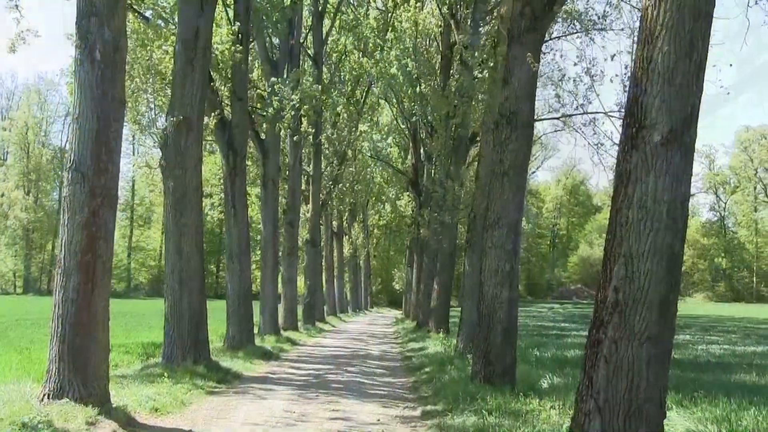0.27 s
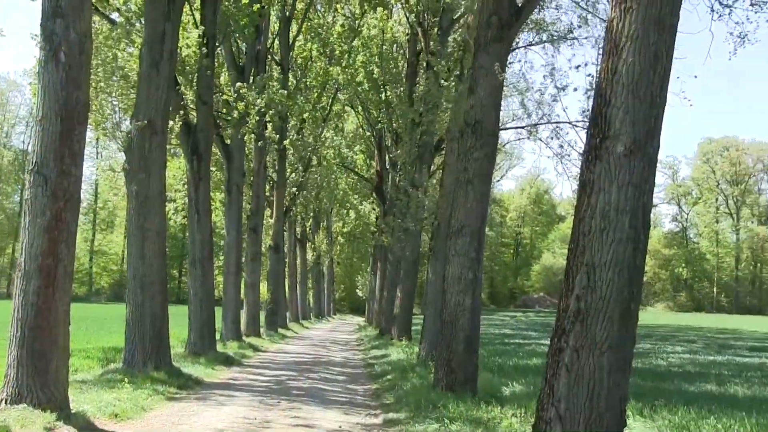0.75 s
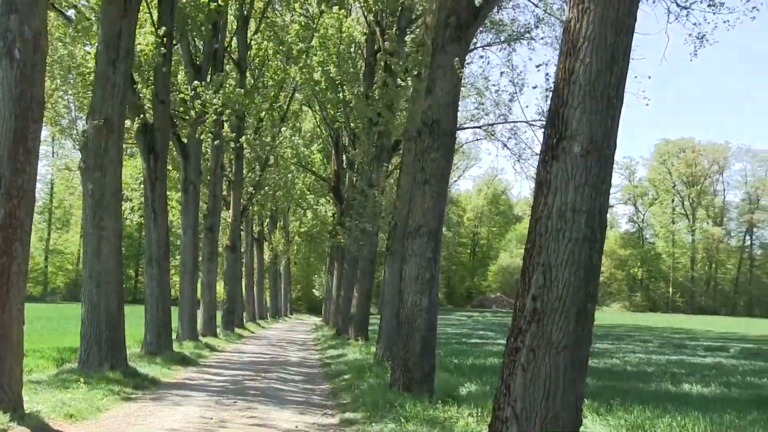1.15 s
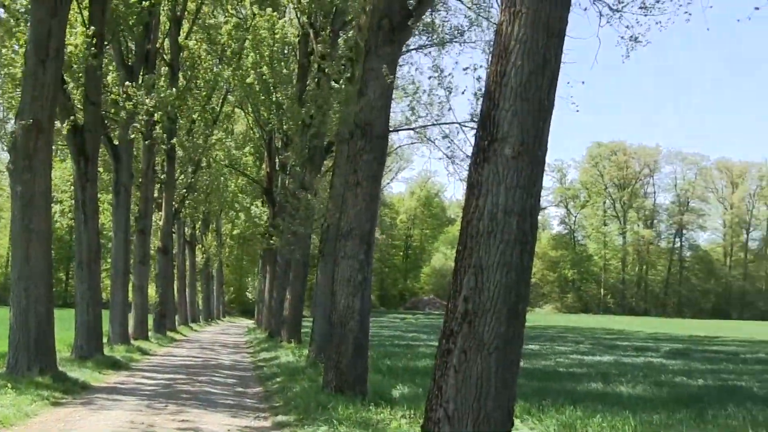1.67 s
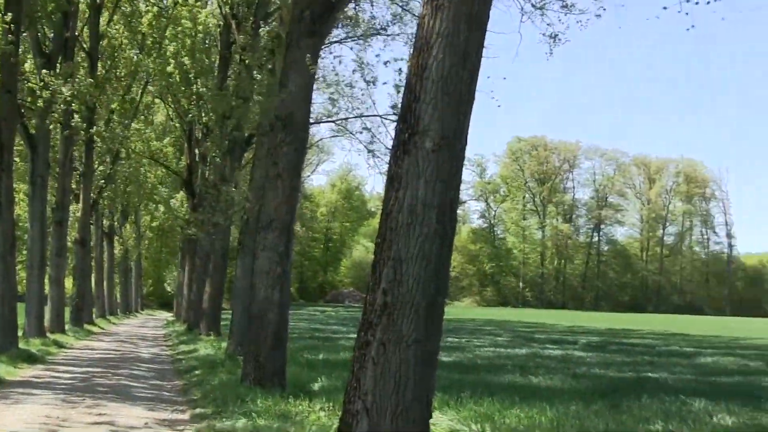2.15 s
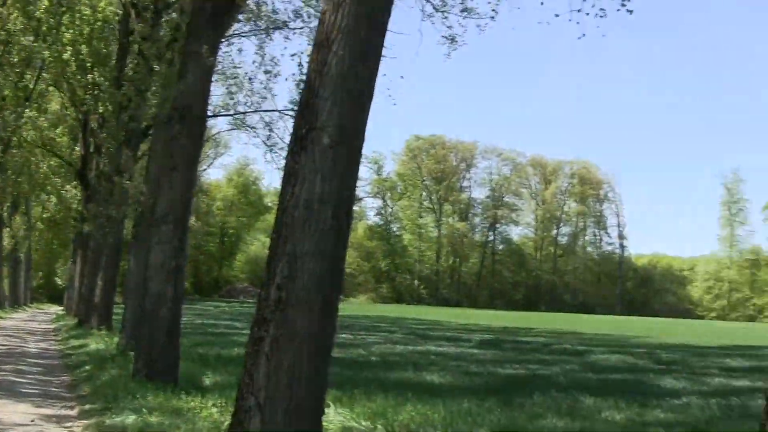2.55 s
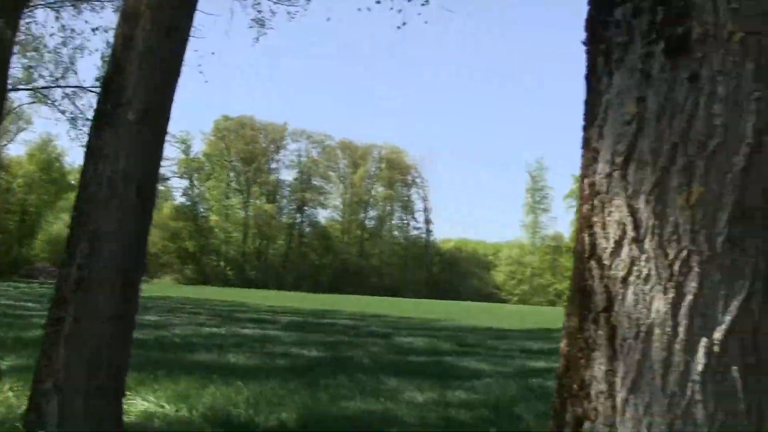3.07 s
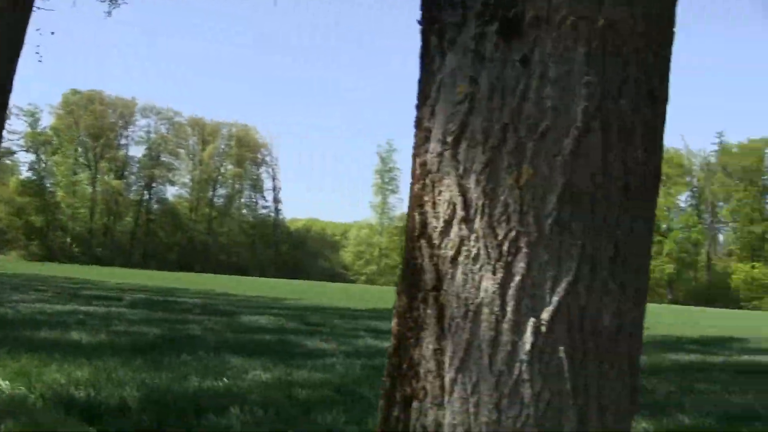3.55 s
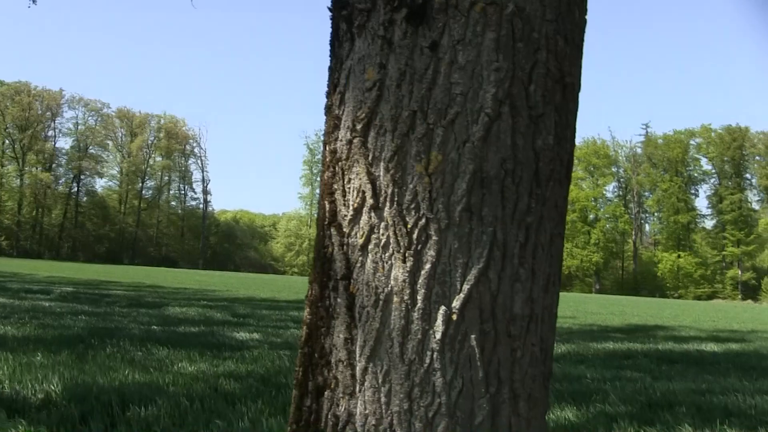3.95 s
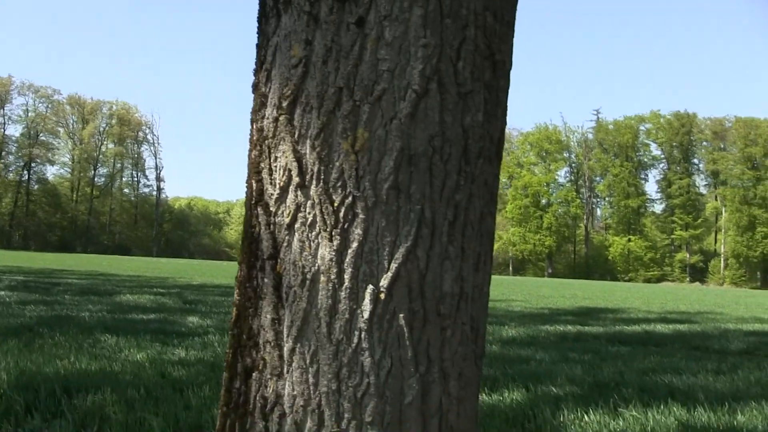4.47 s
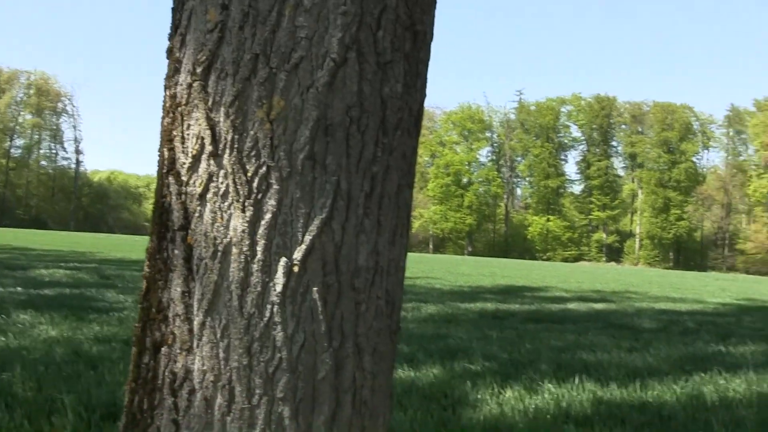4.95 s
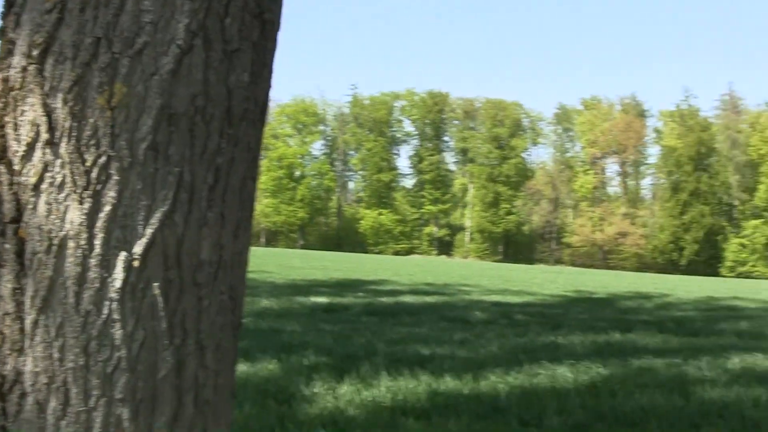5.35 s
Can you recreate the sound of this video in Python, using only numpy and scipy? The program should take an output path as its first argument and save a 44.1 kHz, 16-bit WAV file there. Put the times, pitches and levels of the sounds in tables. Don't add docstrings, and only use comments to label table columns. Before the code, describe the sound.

Wind buffets a hand-held camera's microphone in a leafy avenue, light thumps at first, then a harsh, nearly continuous gale with crackling overload.

```python
import sys
import numpy as np
from scipy import signal
from scipy.fft import rfft, irfft, next_fast_len
from scipy.io import wavfile
from scipy.ndimage import uniform_filter1d, map_coordinates

SR = 44100
rng = np.random.default_rng(int(sys.argv[2]) if len(sys.argv) > 2 else 0)


def dump_mix(stems):
    frames = np.atleast_2d(stems).T
    limited = np.clip(frames, -1, 1)
    pcm = np.round(limited * 32767).astype(np.int16)
    wavfile.write(sys.argv[1], SR, pcm)


def volts_from_decibels(level):
    exponent = np.asarray(level, float) / 20
    return 10 ** exponent


N = 247401


def unit(x):
    return x / np.sqrt(np.mean(x ** 2) + 1e-20)


def along(points, hz):
    f, v = np.transpose(points)
    return np.interp(np.log(hz + 1), np.log(f + 1), v)


def curves(rows):
    s, *columns = np.transpose(rows)
    return [np.interp(np.arange(N) / SR, s, column, left=-120) for column in columns]


def wobble(rate):
    return map_coordinates(rng.standard_normal(N // 100), [np.arange(N) * rate / SR])


def coloured(x, gain):
    m = next_fast_len(N + 8192)
    return irfft(rfft(x, m) * gain(np.fft.rfftfreq(m, 1 / SR)), m)[..., :N]


def shaped(x, spectrum):
    return unit(coloured(x, lambda hz: volts_from_decibels(along(spectrum, hz))))


def impulses(seconds, sizes):
    return np.bincount(np.clip((seconds * SR).astype(int), 0, N - 1), sizes, N)


# frequency_hz, density_db per Hz
LEAF_SPECTRUM = [(25, -40), (60, -5.5), (160, -7), (500, 0), (1200, 0), (2000, -3), (4300, -9.5),
                 (8000, -20.5), (13000, -27), (15600, -33)]
# frequency_hz, likeness 0 to 1
LEAF_COHERENCE = [(300, 1), (1500, 1), (3500, 1), (5000, 0.97), (7000, 0.74), (10000, 0.37), (15000, .2)]
# time_s, gain_db
LEAF_GAIN = [(0, -3), (.45, 1), (2.178, 1.5), (2.19, -15), (2.4, -15.5), (2.76, -10), (2.86, -13),
             (2.93, -13), (3.08, -17.5), (3.27, -17), (3.33, -13), (3.72, -13.5), (3.78, -17.5),
             (4.49, -12), (4.62, -24.5), (4.78, -19.5), (5.0, -16), (5.61, -14)]
# frequency_hz, density_db
SHEEN_SPECTRUM = [(4000, -31), (7000, 0.5), (11000, 0), (15600, -7.5)]


def leaves():
    hiss_db, sheen_db = -29, -15.5
    ducked_db = -14
    bins = signal.stft(rng.standard_normal((2, N)), nperseg=512)[2]
    patches = uniform_filter1d(rng.standard_normal(bins.shape[1:]), size=6, axis=0)
    patches = uniform_filter1d(patches, size=12, axis=1)
    pair = signal.istft(bins * volts_from_decibels(0.44 * unit(patches)), nperseg=512)[1][:, :N]

    def mid_side_gain(hz):
        angle = np.arccos(np.clip(along(LEAF_COHERENCE, hz), -1, 1)) / 2
        return volts_from_decibels(along(LEAF_SPECTRUM, hz)) * np.array([np.cos(angle), np.sin(angle)])

    mid, side = coloured(pair, mid_side_gain)
    hiss = unit(np.array([mid + side, mid - side]))
    gain_db, = curves(LEAF_GAIN)
    fine = shaped(rng.standard_normal((3, N)), SHEEN_SPECTRUM)
    ducking = np.clip(gain_db / ducked_db, 0, 1)
    sheen = volts_from_decibels(sheen_db) * ducking * (fine[:2] + 0.54 * fine[2])
    return volts_from_decibels(hiss_db + gain_db + 0.44 * wobble(4.1)) * (hiss + sheen)


# time_s, level_db
STREAM_LEVEL = [(0, -41.5), (.5, -34.5), (1.3, -32), (2.0, -34.5), (2.2, -16), (2.47, -20), (3.0, -24),
                (3.9, -18), (4.35, -25.5), (4.6, -20), (5.07, -18.5), (5.3, -22.5), (5.61, -18.5)]
# start_s, length_s, level_db, sharpness_db
LIGHT_GUSTS = [(0.05, .035, -32.5, -33), (0.194, 0.036, -29.5, -38), (0.269, 0.034, -24.5, -39),
               (0.345, .04, -33.5, -24), (0.54, 0.061, -36, -41.5), (0.767, 0.041, -19, -36),
               (0.839, 0.075, -15.5, -28.5), (0.936, 0.061, -16, -32), (1.041, 0.051, -17.5, -39),
               (1.093, 0.062, -15, -30.5), (1.179, 0.023, -15.5, -31), (1.443, 0.06, -15, -33),
               (1.527, 0.038, -17.5, -36), (1.583, 0.071, -16, -32.5), (1.705, 0.022, -17.5, -40),
               (1.829, 0.02, -22.5, -40), (1.885, 0.13, -27.5, -38), (2.04, 0.027, -12.5, -25),
               (2.107, 0.053, -12.5, -31)]
# start_s, length_s, level_db, sharpness_db
GALE_GUSTS = [(2.182, 0.16, -9, -15.5), (2.321, 0.095, -14, -21.5), (2.504, 0.073, -11.5, -22.5),
              (2.612, 0.038, -15.5, -24.5), (2.71, 0.063, -9.5, -21.5), (2.775, 0.1, -14.5, -14),
              (2.834, 0.066, -17.5, -29.5), (2.905, 0.178, -11, -17), (3.109, 0.048, -12.5, -19.5),
              (3.196, 0.055, -9.5, -18), (3.273, .1, -11, -18.5), (3.418, 0.12, -11, -15.5),
              (3.553, 0.079, -10.5, -10.5), (3.654, 0.12, -10.5, -13), (3.777, 0.1, -17.5, -7),
              (3.91, 0.1, -23.5, -10.5), (3.993, .13, -10, -14.5), (4.128, 0.081, -13.5, -23.5),
              (4.257, 0.056, -13, -25), (4.448, 0.1, -9, -21), (4.575, 0.017, -10.5, -6.5),
              (4.603, 0.11, -12.5, -15.5), (4.684, 0.074, -13, -16.5), (4.782, 0.15, -11.5, -16.5),
              (4.955, 0.072, -12, -20.5), (5.128, 0.044, -10, -22), (5.242, 0.06, -10, -22.5),
              (5.316, 0.099, -9.5, -19), (5.528, 0.026, -15.5, -17), (5.571, 0.029, -9, -16)]
CREST_EXPONENT = [
    [0.91],
    [1.1],
    [0.61],
    [1.4],
]


def gusts():
    rise_s, fall_s = 0.021, 0.032
    crown_db = 2.5
    stream_sharp_db, middle_sharp_db = -27, -20.5
    t = np.arange(N) / SR

    def shares(sharp_db):
        lift_db = sharp_db - middle_sharp_db
        flutter_db = -8.5 + 0.45 * lift_db
        rumble_db = -18 - lift_db
        return volts_from_decibels(np.array([[0], [flutter_db], [rumble_db], [sharp_db]]))

    power = (volts_from_decibels(curves(STREAM_LEVEL)[0]) * shares(stream_sharp_db)) ** 2
    for s, length, db, sharp_db in LIGHT_GUSTS + GALE_GUSTS:
        near = slice(max(round((s - rise_s) * SR), 0), round((s + length + fall_s) * SR))
        u = t[near] - s
        shape = np.clip(1 + np.minimum(u / rise_s, (length - u) / fall_s), 0, 1) ** 2
        shape = shape * volts_from_decibels(crown_db * (0.29 - (2 * u / length - 1) ** 2))
        power[:, near] += (shape ** np.array(CREST_EXPONENT) * volts_from_decibels(db) * shares(sharp_db)) ** 2
    return 10 * np.log10(power)


# time_s, half_width_s, depth_db
FLOW_LULLS = [
    (1.021, 0.014, -2.5),
    (1.075, 0.013, 10.5),
    (2.095, 0.0053, 21),
    (2.153, 0.01, 15.5),
    (2.678, 0.0094, 24),
    (4.568, 0.0059, 7.5),
    (5.217, 0.0076, 4),
    (5.309, .013, 14.5),
    (5.573, 0.0091, 17),
]
# frequency_hz, density_db per Hz
RUMBLE_SPECTRUM = [(20, -17), (60, -38), (110, -8), (180, -1), (300, -7), (600, -39), (2500, -120)]
THUD_SPECTRUM = [(60, -57.5), (150, -14), (260, -0.5), (500, 0), (800, -12.5), (1500, -30.5), (3000, -67.5),
                 (8000, -120)]
FLUTTER_SPECTRUM = [(300, -78.5), (600, -1.5), (850, -0.5), (1500, -10.5), (2500, -21.5), (5000, -78),
                    (12000, -120)]
SPIT_SPECTRUM = [(700, -24.5), (1400, -4.5), (2200, -0.5), (3200, -7), (4500, -24.5), (7000, -37.5),
                 (16000, -94.5)]
FIZZ_SPECTRUM = [(2000, -24.5), (3500, -8), (5000, -12), (7500, -31), (11000, -49), (18000, -100)]


def eddies(count=4500):
    draw = rng.random((count, 3))
    at = draw[:, 0] * N / SR
    sign = np.sign(draw[:, 1] - 0.5)
    size = -np.log(draw[:, 2] + 0.015)
    lumps = 2.17 * wobble(30) + 1.45 * wobble(110)

    def layer(spectrum, scatter_db, lumpy, own_db, smooth):
        grains = unit(impulses(at, sign * volts_from_decibels(scatter_db * size)))
        flow = grains + smooth * rng.standard_normal(N)
        return shaped(flow * volts_from_decibels(lumpy * lumps + own_db * wobble(45)), spectrum)

    t = np.arange(N) / SR
    hold = volts_from_decibels(-sum(db * np.exp(-((t - s) / half) ** 4) for s, half, db in FLOW_LULLS))
    strong_s = np.array(STRONG_EDDIES + MORE_EDDIES)[:, 0]
    strong = impulses(strong_s - 0.003, np.ones(len(strong_s)))
    swept = np.clip(np.convolve(strong, np.hanning(700), "same"), 0, 1)
    hold = hold * (1 - 0.18 * swept)
    thud_db, flutter_db, rumble_db, spit_db = gusts()
    fizz_db = 1.3 * (spit_db + 21.5) - 41.5
    rumble = volts_from_decibels(rumble_db - 0.1) * layer(RUMBLE_SPECTRUM, scatter_db=3.5, lumpy=1.0, own_db=0.9, smooth=0.7)
    thud = volts_from_decibels(thud_db - 2.5) * layer(THUD_SPECTRUM, scatter_db=2.5, lumpy=0.13, own_db=1.0, smooth=0.44)
    flutter = layer(FLUTTER_SPECTRUM, scatter_db=4.5, lumpy=0.68, own_db=3.0, smooth=0.37)
    flutter = volts_from_decibels(flutter_db - 1.5) * flutter
    spit = volts_from_decibels(spit_db - 3.5) * layer(SPIT_SPECTRUM, scatter_db=7.0, lumpy=1.15, own_db=2.5, smooth=0.12)
    fizz = volts_from_decibels(fizz_db) * layer(FIZZ_SPECTRUM, scatter_db=6.0, lumpy=1.2, own_db=3, smooth=0.43)
    return hold * (rumble + thud + flutter + spit + fizz)


# time_s, peak_db, pitch_hz
STRONG_EDDIES = [(0.288, -10, 342), (0.801, -1.5, 330), (1.096, -2, 316), (1.113, -4.5, 343),
                 (1.191, 1.5, 386), (1.454, -3.5, 300), (1.627, -0.5, 363), (2.049, 2.5, 350),
                 (2.124, 5.5, 483), (2.188, 4, 490), (2.273, -4, 597), (2.541, 1, 486), (2.819, 0.5, 435),
                 (2.957, 6, 436), (3.226, 2, 487), (3.351, 6, 720), (3.477, 9.5, 684), (3.656, -11, 623),
                 (3.745, 6, 500), (3.785, 1.5, 640), (3.992, -1, 805), (4.268, 4.5, 600),
                 (4.299, -6.5, 770), (4.385, -5.5, 670), (4.486, 6, 690), (4.72, 4, 605), (5.011, 4.5, 370),
                 (5.138, 1, 520), (5.276, 8, 556), (5.332, 5, 610)]
# time_s, peak_db, pitch_hz
MORE_EDDIES = [(0.065, -25, 245), (0.196, -18, 342), (0.356, -15.5, 240), (0.575, -17.5, 200),
               (0.761, -18, 263), (0.873, -7.5, 433), (0.934, -11, 326), (0.958, -3.5, 680),
               (0.977, -6, 223), (1.166, -18, 353), (1.489, -2.5, 291), (1.532, -7.5, 270),
               (1.606, -19.5, 240), (1.829, -12, 312), (2.791, 3, 450), (3.193, -6, 490),
               (5.229, -17, 256), (5.536, -10, 298), (5.587, -1, 450), (0.911, -1.5, 473),
               (2.73, -6.5, 352), (2.901, -8.5, 430), (3.069, -3.5, 604), (3.453, -1, 635),
               (4.46, -2.5, 428), (4.586, -4.5, 480), (4.868, -3, 533), (5.364, 2, 420), (5.378, -1, 590),
               (5.481, -3.5, 450)]


def slaps():
    out = np.zeros(N + SR)
    t = np.arange(-400, 400) / SR
    for (s, db, hz), turn in zip(STRONG_EDDIES + MORE_EDDIES, rng.random(200)):
        swing = np.exp(-(t * hz / 0.72) ** 2) * np.cos(2 * np.pi * (hz * t + turn))
        out[round(s * SR):][:len(t)] += volts_from_decibels(db - 2.0) * swing
    return out[400:N + 400]


# time_s, peak_db,
# top_db re peak
SHARP_EDDIES = [(2.227, -20, -31), (2.2938, -4, -39), (2.34, -18, -37), (2.819, -14, -28),
                (2.961, -14, -37), (3.045, -10.5, -43), (3.07, -12, -42), (3.2077, -9, -37),
                (3.351, -12, -22), (3.3668, -17.5, -24), (3.563, -5, -40), (3.5885, -19.5, -32),
                (3.596, -5.5, -40), (3.642, -17, -43), (3.6811, -13, -35.5), (3.733, -3, -36),
                (3.8316, -13.5, -20.5), (3.849, -3.5, -40.5), (3.957, -10, -27.5),
                (4.0025, -16.5, -20.5), (4.0068, -13, -42), (4.1793, -19, -32), (4.541, -15, -33),
                (4.5907, -11, -17), (4.5968, -4, -37.5), (4.7002, -9, -36), (4.7074, -16, -31.5),
                (4.7162, -3, -31.5), (4.7188, -3.5, -26), (5.275, -7, -50),
                (4.51, -25, -33), (4.5253, -18, -36), (4.558, -24, -28), (4.615, -25, -29),
                       (4.6506, -21.5, -24), (4.6614, -23, -27), (4.747, -19, -28), (4.756, -26, -33),
                       (4.766, -22.5, -30), (5.234, -30, -28), (5.3827, -19, -37), (5.4015, -25, -40),
                       (5.4104, -29, -33), (5.4244, -36, -23), (5.584, -16, -18), (5.608, -23, -1),
                       (2.706, -18, -28), (2.73, -31, -30), (4.3, -22, -21), (5.1365, -13, -26),
                       (5.3327, -18.5, -31), (4.7327, -15.5, -20), (5.28, -13, -37), (5.538, -16.5, -24),
                       (2.2063, -15, -25), (3.5258, -17, -24), (3.7795, -15, -36), (4.8228, -16, -33),
                       (4.872, -19, -30)]
# frequency_hz, density_db per Hz
TOP_SPECTRUM = [(3000, -25), (5500, 14), (9000, -4.5), (13000, -15.5), (16000, -28.5)]


def ticks():
    s, db, top_db = np.transpose(SHARP_EDDIES)
    t = np.arange(-150, 151) / SR
    draw = rng.random((len(s), 2))
    hz = 1900 * volts_from_decibels(4.65 * draw[:, :1])
    swings = np.exp(-(t / 0.00025) ** 2) * np.cos(2 * np.pi * (hz * t + draw[:, 1:]))
    swings = volts_from_decibels(db - 0.5)[:, None] * swings
    where = np.round(s * SR).astype(int)[:, None] + np.round(t * SR).astype(int)
    edge = np.bincount(where.ravel(), swings.ravel(), N + SR)[:N]
    strikes = impulses(s, volts_from_decibels(db + top_db + 1.5))
    outline = signal.fftconvolve(strikes, np.exp(-(t / 0.00029) ** 2), "same")
    return edge + outline * shaped(rng.standard_normal(N), TOP_SPECTRUM)


def scene():
    around = leaves()
    push = eddies() + slaps()
    snaps = ticks()
    push = push / (1 + np.abs(push / 1.1) ** 3) ** (1 / 3)
    stray = np.gradient(volts_from_decibels(-2.0) * snaps + volts_from_decibels(-22.5) * push)
    return np.array([push + snaps + stray, push + snaps - stray]) + around


def low_pass(x):
    return signal.sosfilt(signal.butter(12, 15670, fs=SR, output="sos"), x)


# frequency_hz, gain_db
RUMBLE_FILTER = [(20, -18), (45, -14.5), (80, -0.5), (15600, 0)]


def record(dry):
    x = coloured(dry, lambda hz: volts_from_decibels(along(RUMBLE_FILTER, hz)))
    mix = x / (1 + np.abs(x / 1.1) ** 6) ** (1 / 6)
    return low_pass(mix)


dry = scene()
out = record(dry)
dump_mix(out)
```